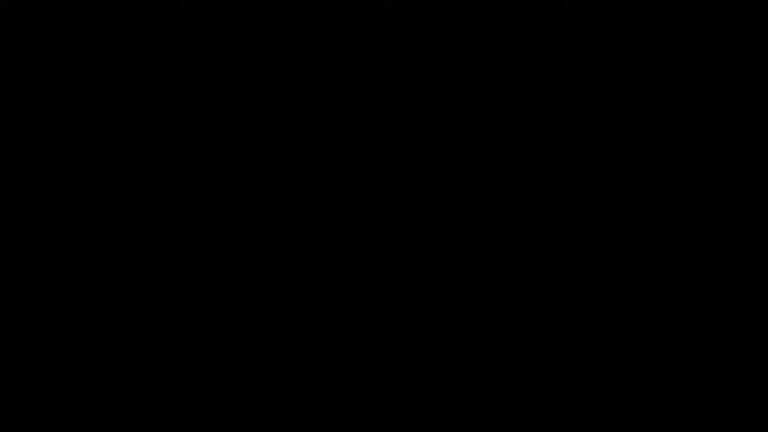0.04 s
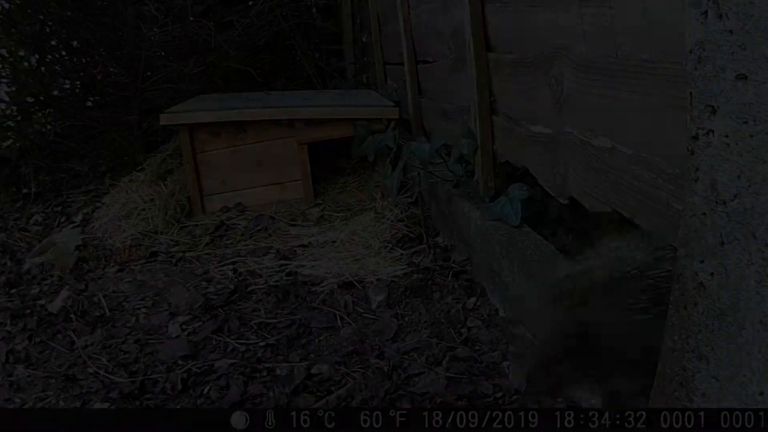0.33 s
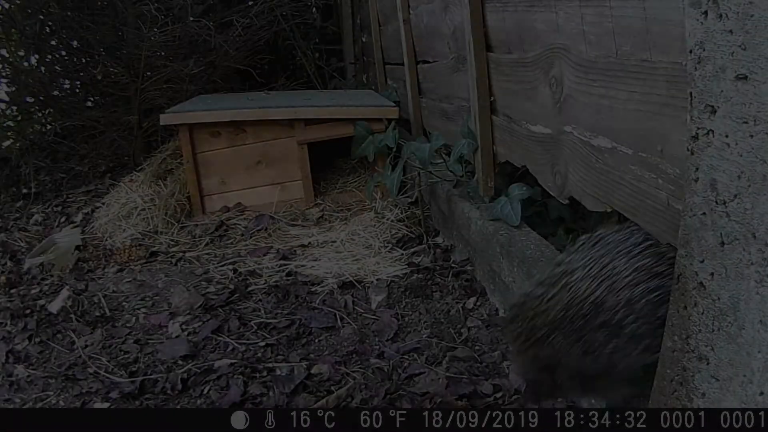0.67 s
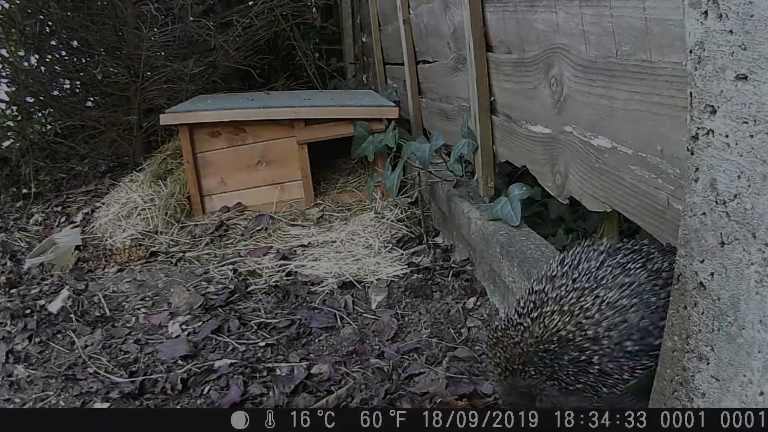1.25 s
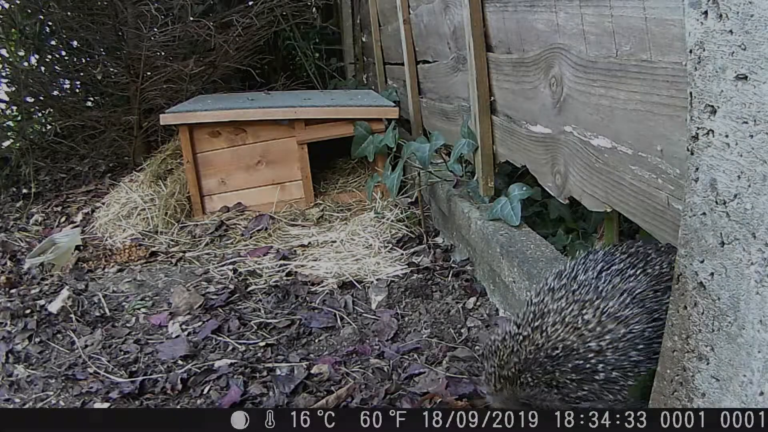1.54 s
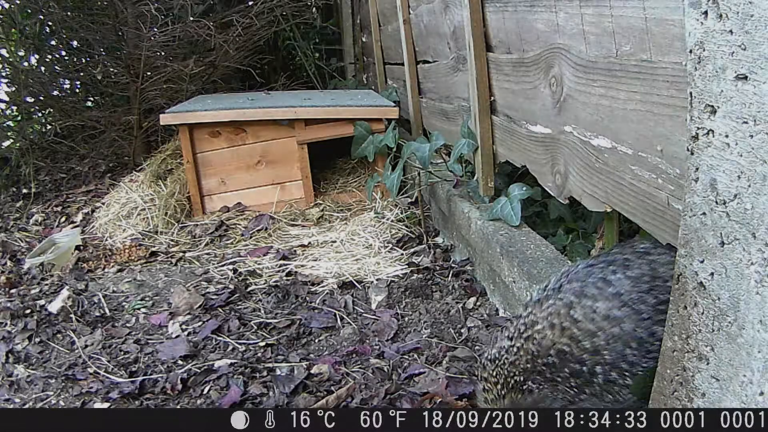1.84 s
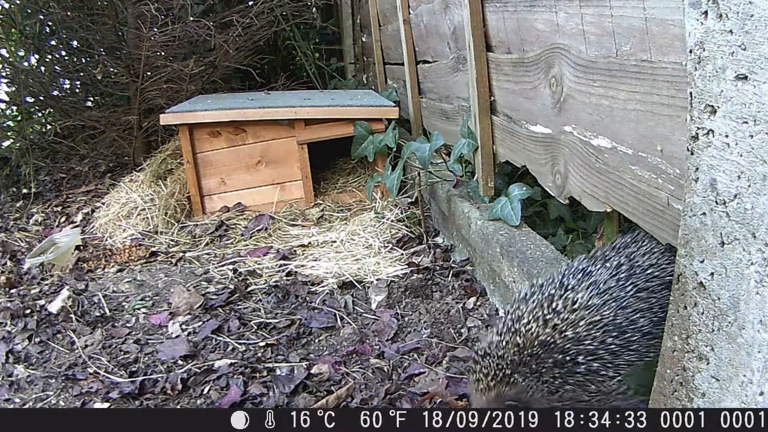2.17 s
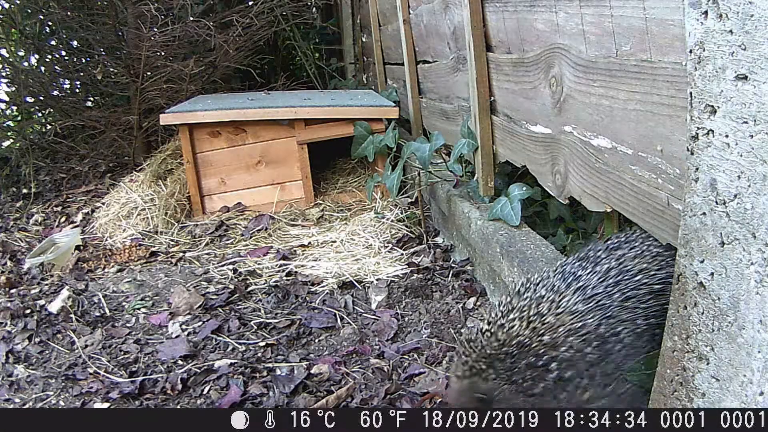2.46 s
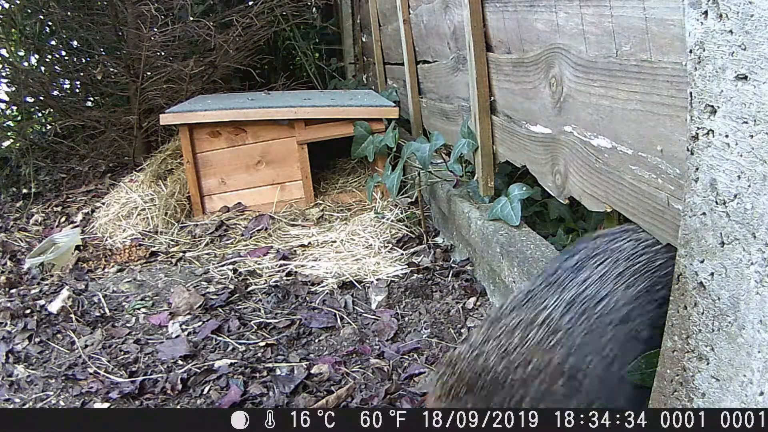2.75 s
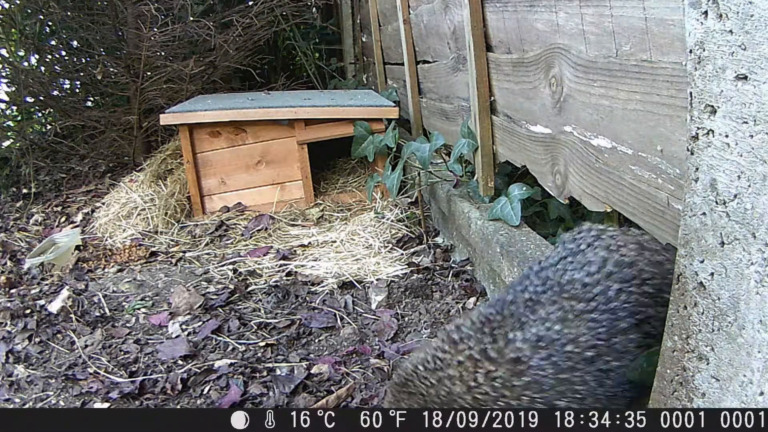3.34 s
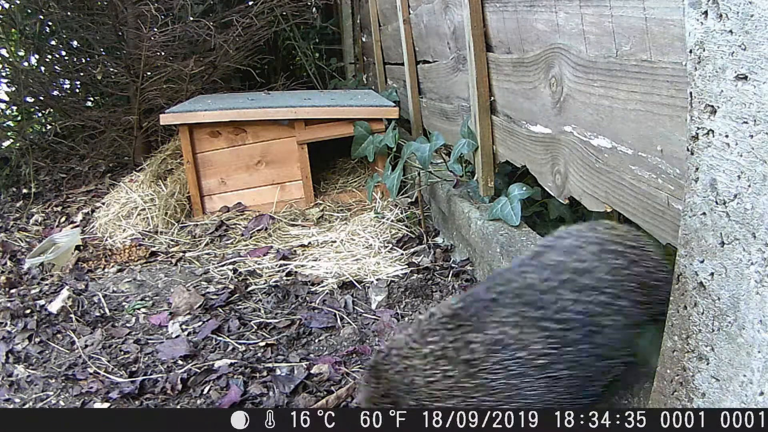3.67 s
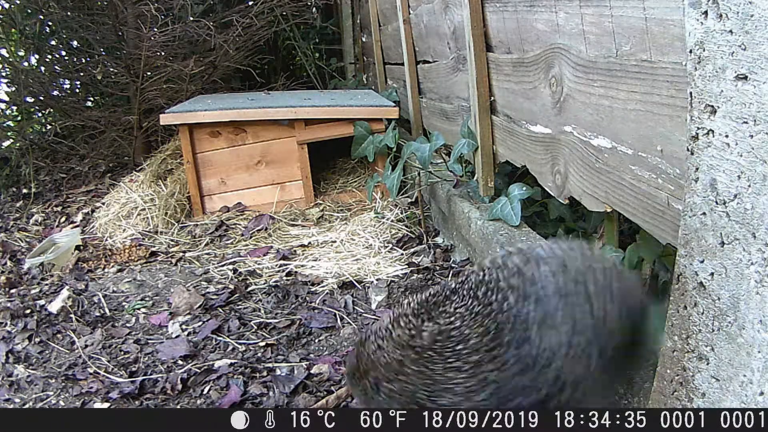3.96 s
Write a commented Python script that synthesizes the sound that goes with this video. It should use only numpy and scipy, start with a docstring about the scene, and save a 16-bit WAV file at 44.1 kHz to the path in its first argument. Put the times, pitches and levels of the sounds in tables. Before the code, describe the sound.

Pulsing electrical interference in a trail camera's own microphone follows a switch-on pop, turning from buzzy whine to hiss above a steady hum. Behind it come faint dry leaf cracks from a hedgehog and thin, far-off bird whistles in a garden.

```python
"""A trail camera in a quiet garden switches on with a pop, then hears mostly its own rumble, hum and hiss.
Soon bursts of electrical noise come five times a second, probably from writing to its card.
They whine at first and later mostly hiss. Meanwhile a hedgehog faintly stirs and cracks dry leaves
as it squeezes under the fence. A bird whistles far off, once early on and a few times near the end."""
import sys
import numpy as np
from scipy import signal
from scipy.fft import rfft, irfft
from scipy.io import wavfile

SR = 44100
rng = np.random.default_rng(int(sys.argv[2]) if len(sys.argv) > 2 else 0)


def digitize_waveform(pressure):
    """Quantize a signal to 16-bit integers and store it at the path in sys.argv[1].

    Rows of a 2-D input are taken as channels; values are limited to [-1, 1].
    """
    field = np.atleast_2d(pressure).T
    bounded = np.clip(field, -1, 1)
    quanta = np.round(bounded * 32767).astype(np.int16)
    wavfile.write(sys.argv[1], SR, quanta)


N = 176400
ON_S = .0787  # when the camera switches on

# The bursts of card writing. Each row: start in seconds, length in seconds, hiss gain in dB,
# whine gain in dB.
BURSTS = [(.284, .064, -5, -2.5), (.484, .064, -5, -3), (.684, .078, -7.5, -1), (.884, .074, -5.5, -2.5),
          (1.085, .087, -7, -1.5), (1.286, .034, -10, -2.5), (1.333, .09, -1.5, -14),
          (1.484, .1, -1.5, -15), (1.684, .104, .5, -22), (1.884, .089, 0, -20), (2.019, .035, -1, -20),
          (2.084, .107, -.5, -23), (2.284, .095, -1, -10), (2.484, .049, .5, -17), (2.557, .084, -.5, -25),
          (2.684, .087, -.5, -18), (2.884, .106, -1, -26), (3.084, .089, -.5, -22), (3.284, .111, -.5, -26),
          (3.484, .083, 0, -18), (3.684, .156, -.5, -21), (3.884, .086, -.5, -9)]


def undb(db):
    """Turn decibels into a number to multiply by."""
    return 10 ** (np.asarray(db) / 20)


def shape(x, gain):
    """Filter a sound: gain(f) says how much of each frequency f gets through."""
    hz = np.maximum(np.arange(N // 2 + 1) * SR / N, 1)
    return irfft(rfft(x) * gain(hz), N)


def colour(x, points):
    """Filter a sound by a curve drawn through (Hz, dB) points."""
    hz, db = np.array(points).T
    return shape(x, lambda f: undb(np.interp(np.log(f), np.log(hz), db)))


def band(x, hz, octaves):
    """Keep the frequencies around hz; more octaves make the band wider."""
    return shape(x, lambda f: np.exp(-(np.log2(f / hz) / octaves) ** 2 / 2))


def noise(points):
    """Steady noise whose strength follows (Hz, dB per Hz) points."""
    return colour(rng.standard_normal(N), points) * np.sqrt(SR / 2)


def drift(rate_hz):
    """A smooth random wobble of about 1 either way; a higher rate wobbles faster."""
    wobble = shape(rng.standard_normal(N), lambda f: np.exp(-(f / rate_hz) ** 2))
    return wobble / wobble.std()


def swell(t, peak_s, half_s):
    """A loudness curve that rises smoothly to 1 and falls again."""
    return np.exp(-((t - peak_s) / half_s) ** 2 / 2)


def ringing(hz, width_hz):
    """Noise that rings around one pitch, with a strength of 1."""
    ring = shape(rng.standard_normal(N), lambda f: 1 / (1 + ((f - hz) / (.75 * width_hz)) ** 2))
    return ring / ring.std()


def idle_noise(t):
    """The camera's own rumble and hiss, with a low hum that wavers a little."""
    # The microphone's steady noise. Each row: frequency in Hz, level in dB per Hz.
    noise_floor = [(12, -62), (19, -61), (30, -68), (50, -71.5), (80, -78), (105, -83.5), (150, -89.5),
                   (300, -97), (700, -104), (850, -102.5), (1200, -106.5), (2350, -110), (2550, -107.5),
                   (2750, -111.5), (3900, -115.5), (4800, -121.5), (5500, -117), (6100, -119),
                   (6700, -114.5), (7500, -118), (8200, -128)]
    hum_hz, hum_db = 59.78, -59.5
    hum = np.sqrt(2) * np.sin(2 * np.pi * hum_hz * t + .5 * drift(2.3))
    return noise(noise_floor) + undb(hum_db) * hum


def bird(t):
    """Thin, faint whistles, probably a distant bird, wavering in pitch and loudness."""
    # Each row: middle of the note in seconds, half length in seconds, level in dB, pitch in Hz.
    whistles = [(1.038, 0.026, -88, 5220), (3.411, 0.0032, -82, 6040), (3.705, 0.015, -80, 4280),
                (3.772, 0.016, -82, 4290), (3.956, 0.016, -76, 4170)]
    wander, flutter_db = .009, 2.5
    out = np.zeros(N)
    for when, half, db, hz in whistles:
        phase = 2 * np.pi * np.cumsum(hz * (1 + wander * drift(130))) / SR
        loudness = undb(db + flutter_db * drift(70)) * swell(t, when, half)
        out += loudness * np.sqrt(2) * np.sin(phase)
    return out


def housing_ring(cracks):
    """Every crack rings briefly at the same few pitches, probably in the microphone's housing."""
    # Each row: pitch in Hz, seconds to fade by 60 dB, relative level in dB.
    housing_tones = [(900, 0.0057, -11), (1490, 0.0068, -8), (2130, 0.015, -4), (3450, 0.012, 1),
                     (3830, .012, -7), (4250, .014, -3.5), (5060, .012, -11), (5530, 0.014, -3),
                     (6100, 0.011, -13), (7560, 0.0085, -7)]
    age = np.arange(SR // 20) / SR
    ring = sum(undb(db - 60 * age / fade) * np.sin(2 * np.pi * hz * age)
               for hz, fade, db in housing_tones)
    return signal.fftconvolve(cracks, ring / np.linalg.norm(ring))[:N]


def leaf_rustles(t):
    """The hedgehog stirs dry leaves, setting off brief flurries of tiny cracks."""
    # Each row: middle in seconds, half length in seconds, level in dB and centre frequency in Hz,
    # both before the housing rings.
    rustles = [(0.438, 0.0046, -81, 4500), (.889, 0.005, -65, 1350), (1.351, 0.008, -71, 5700),
               (1.66, 0.019, -79, 4000), (1.706, 0.006, -74, 4800), (1.722, 0.008, -70, 2000),
               (2.142, 0.015, -77, 3830), (2.615, 0.005, -80, 3400), (3.549, 0.005, -80, 3600),
               (3.608, 0.007, -81, 3500)]
    cracks_per_s, spread_db = 3000, 4
    out = np.zeros(N)
    for when, half, db, hz in rustles:
        cracks = (rng.random(N) < cracks_per_s / SR) * rng.choice([-1, 1], N)
        sizes = undb(spread_db * rng.standard_normal(N))
        crackle = band(cracks * sizes, hz, octaves=.56)
        out += undb(db) * swell(t, when, half) * crackle / crackle.std()
    return housing_ring(out)


def leaf_snaps(t):
    """A leaf or stalk gives way: one sharp crack, then a brief crumbling."""
    # Each row: time in seconds, strength in dB before filtering, centre frequency in Hz.
    snaps = [(.8872, -49, 2900), (.9385, -48.5, 4500), (1.6975, -46, 3400), (1.7005, -46, 3400),
             (1.7155, -50, 3900), (1.7242, -46, 3700), (2.5878, -51, 6000), (2.6142, -52, 3300),
             (2.6208, -50.5, 3500), (2.6447, -44.5, 3800), (2.6468, -50, 3800), (3.5567, -38, 4600),
             (3.5592, -42, 4800)]
    crumble, fade_s = .08, .0012
    out = np.zeros(N)
    for when, db, hz in snaps:
        push = crumble * rng.standard_normal(N) * (t > when) * np.exp(-np.abs(t - when) / fade_s)
        push[int(when * SR)] = 1  # the crack itself
        out += undb(db) * band(push, hz, octaves=.5)
    return housing_ring(out)


def power_pop(t):
    """At switch-on the microphone's voltage jumps, then drains away."""
    # The tone of the pop. Each row: frequency in Hz, gain in dB.
    pop_colour = [(1000, -0.5), (2500, -2.5), (3600, -6), (4700, -13), (5700, -8.5), (7200, -6),
                  (8400, -12.5)]
    jump_db, rise_s, drain_s = -23.5, .00002, .073
    age = np.maximum(t - ON_S, 0)
    voltage = undb(jump_db) * (1 - np.exp(-age / rise_s)) * np.exp(-age / drain_s)
    return colour(voltage, pop_colour)


def write_blips(t):
    """A tiny high ping opens each round of card writing."""
    first_s, every_s, width_s = .2845, .2, .0011
    hz, db = 4520, -67
    pulses = sum(np.exp(-((t - when) / width_s) ** 2) for when in np.arange(first_s, t[-1], every_s))
    return undb(db) * pulses * np.sin(2 * np.pi * hz * t + drift(170))


def supply_sag(t):
    """Each write makes the power supply dip, giving a soft thud at both ends of the burst."""
    dip_db, smooth_hz, drain_hz = -46, 39.5, 2.7
    busy = sum((t > start) & (t < start + length) for start, length, _, _ in BURSTS)
    # Round off the edges of each dip and let it drain back towards zero.
    dips = shape(busy, lambda f: 1 / (1 + 1j * f / smooth_hz) ** 2 / (1 + drain_hz / (1j * f)))
    return -undb(dip_db) * dips


def card_writes(t):
    """Electrical bursts: a ringing hiss and a buzzy whine switch on and off together."""
    # Each burst adds its own gains to the levels in these three tables.
    # The smooth part of the hiss. Each row: frequency in Hz, level in dB per Hz.
    hiss_curve = [(60, -81.5), (200, -91.5), (400, -99), (1000, -114), (2200, -115), (3000, -117),
                  (4400, -117), (6000, -124), (7000, -119), (8100, -117), (8500, -124)]
    # The pitches that ring in the hiss. Each row: pitch in Hz, width in Hz, level in dB.
    hiss_rings = [(2540, 120, -87), (3430, 140, -85.5), (3885, 70, -84.5), (4130, 120, -92),
                  (4320, 90, -87.5), (4560, 180, -89.5), (5440, 150, -84.7), (5620, 170, -84.2),
                  (6640, 120, -81.5), (7250, 220, -86.5), (7680, 200, -88)]
    # The tones of the whine. Each row: multiple of the lowest pitch, level in dB.
    whine_tones = [(1, -84), (2, -84), (3, -82), (5, -86), (6, -85), (7, -84), (8, -85.5), (9, -77.5),
                   (11, -81), (12, -87.5), (13, -90.5), (14, -94.5)]
    whine_hz, wander, rasp, edge_s = 596.3, .011, .35, .0021
    hiss_gain, whine_gain = np.zeros(N), np.zeros(N)
    for start, length, hiss_db, whine_db in BURSTS:
        switched_on = np.clip(np.minimum(t - start, start + length - t) / edge_s + .5, 0, 1)
        hiss_gain += switched_on * undb(hiss_db)
        whine_gain += switched_on * undb(whine_db)
    phase = 2 * np.pi * np.cumsum(whine_hz * (1 + wander * drift(260))) / SR
    whine = sum(np.sqrt(2) * undb(db) * np.sin(round(multiple) * phase + 2 * np.pi * rng.random())
                for multiple, db in whine_tones)
    hiss = noise(hiss_curve) + sum(undb(db) * ringing(hz, width) for hz, width, db in hiss_rings)
    roughness = (1 + rasp * drift(380)) / np.hypot(1, rasp)
    return hiss_gain * hiss + whine_gain * whine * roughness


def scene():
    """Silence until the camera wakes, then its own noises, the leaves and the bird."""
    t = np.arange(N) / SR
    camera = idle_noise(t) + card_writes(t) + write_blips(t) + supply_sag(t)
    garden = leaf_rustles(t) + leaf_snaps(t) + bird(t)
    return ((t >= ON_S) * (camera + garden) + power_pop(t))[None]


def record(dry):
    """The camera turns down two narrow bands of frequencies and cuts off the highest treble."""
    # Each entry: the middle of a weakened band in Hz.
    notches = (3200, 6400)
    width_hz, depth, top_hz = 320, .74, 8250
    for hz in notches:
        notched = signal.lfilter(*signal.iirnotch(hz, hz / width_hz, fs=SR), dry)
        dry = dry + depth * (notched - dry)
    return signal.sosfilt(signal.ellip(8, .2, 70, top_hz, fs=SR, output="sos"), dry)


dry = scene()
out = record(dry)
digitize_waveform(out)
```